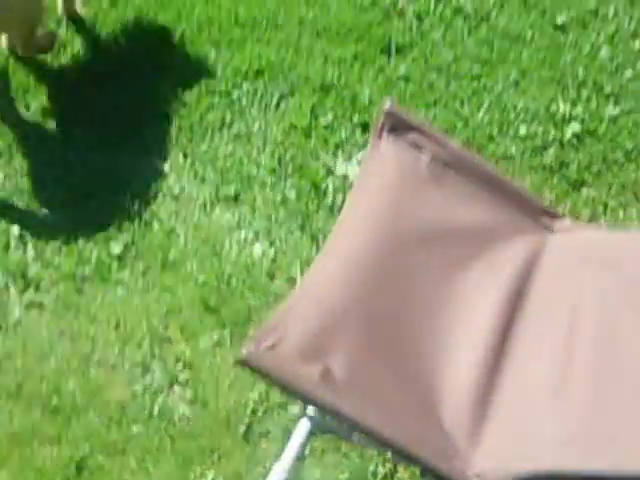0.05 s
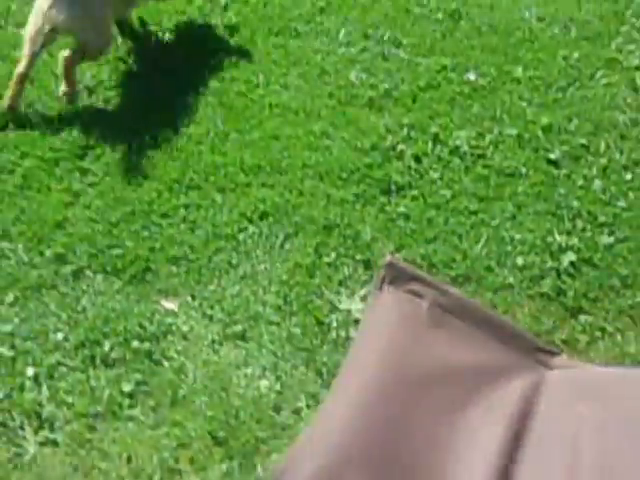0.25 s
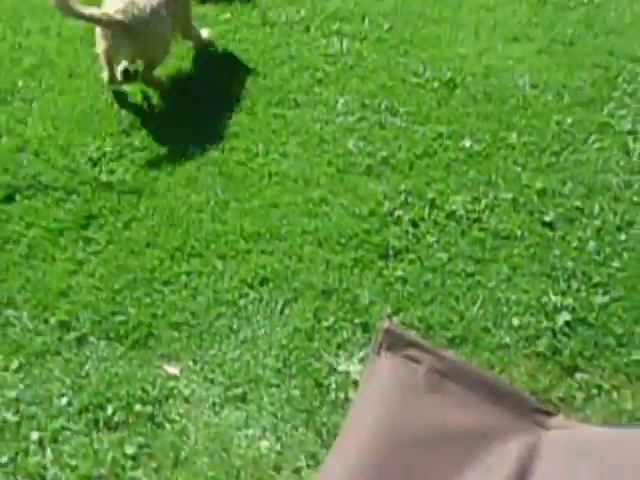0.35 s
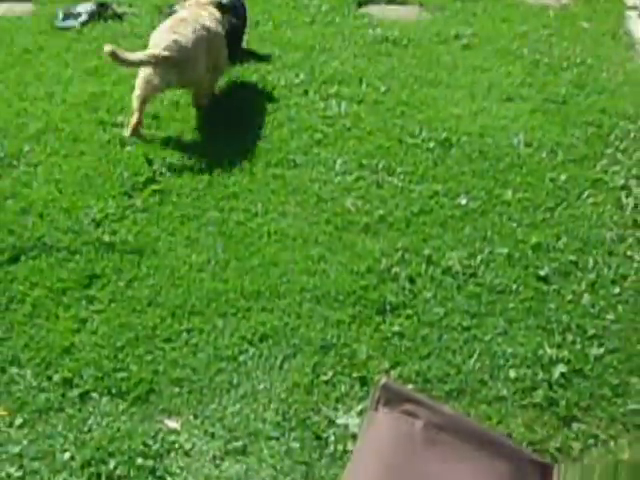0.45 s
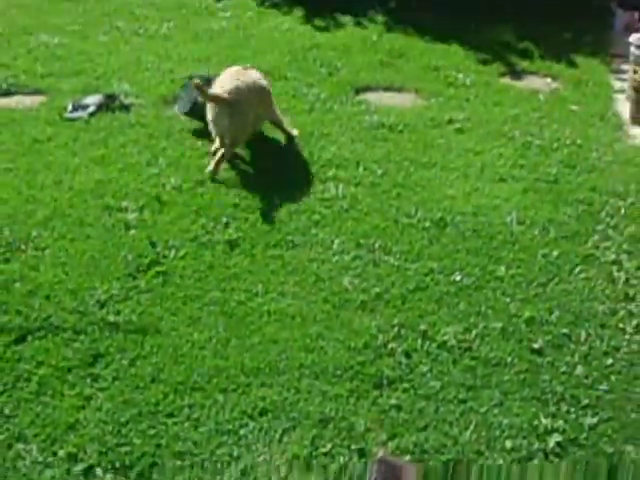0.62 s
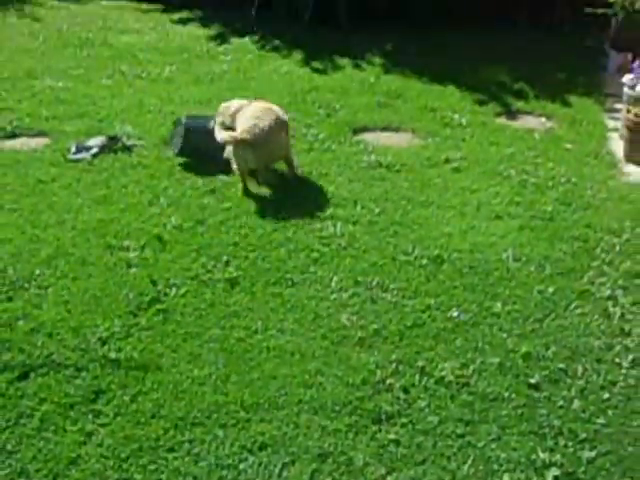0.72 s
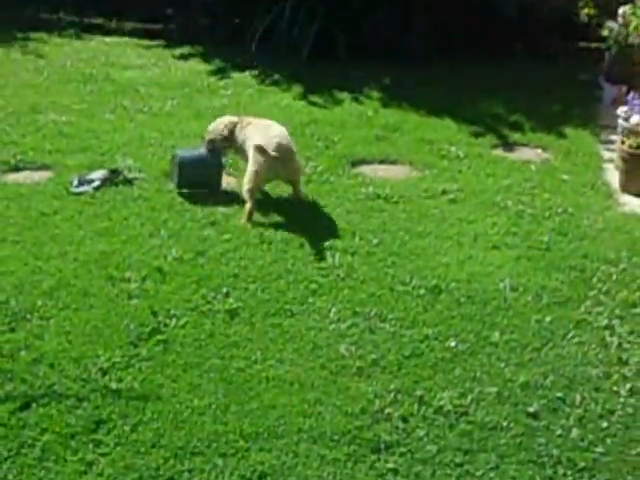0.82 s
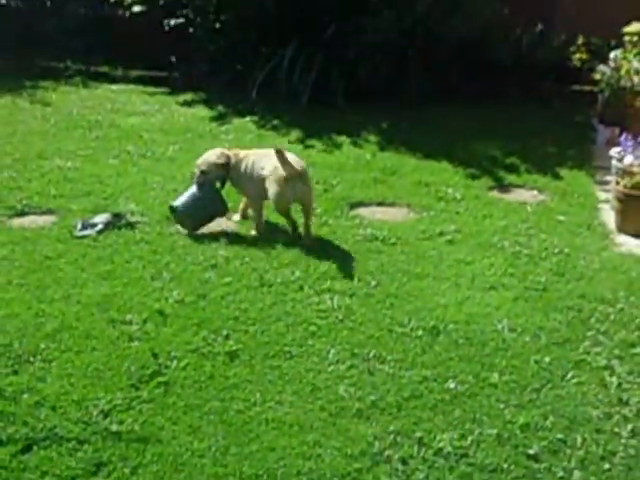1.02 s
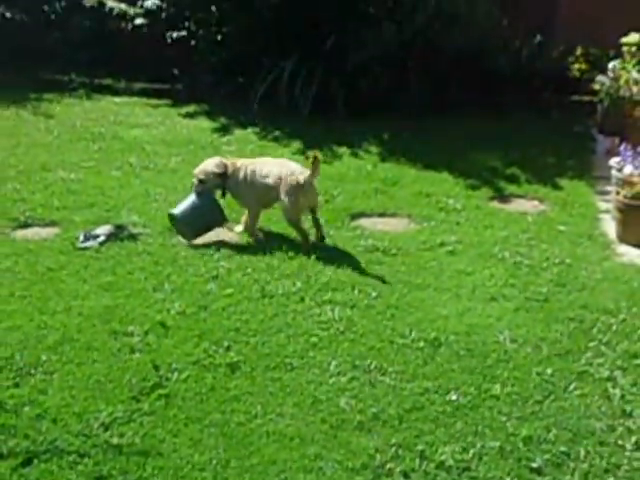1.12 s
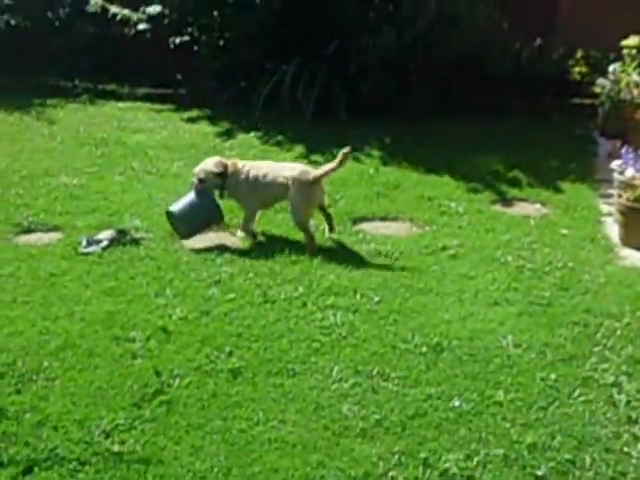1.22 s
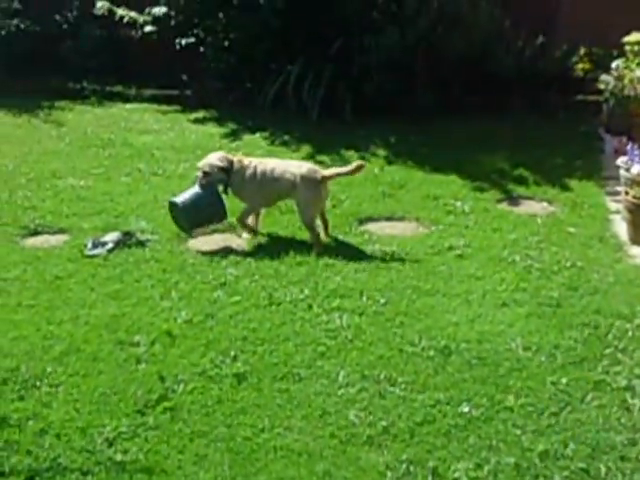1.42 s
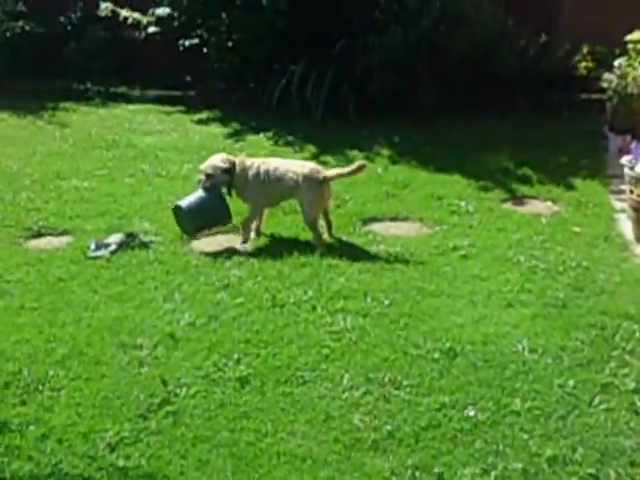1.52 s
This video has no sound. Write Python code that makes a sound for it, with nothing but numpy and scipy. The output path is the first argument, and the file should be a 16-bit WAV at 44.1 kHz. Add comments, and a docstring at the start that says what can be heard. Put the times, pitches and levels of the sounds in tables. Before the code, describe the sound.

A dog knocks an empty plastic plant pot in quick, hollow taps from about 0.7 to 1.2 seconds, loudest at 0.8. Before that, paws scuff and thud on grass from 0.1 to 0.5 seconds, and wind thumps the microphone hard at 0.2. Faint birds peep early over a soft hiss and low wind rumble. Fingers lightly rub the camera, and its case clicks around 1.4 to 1.5 seconds.

```python
"""First come faint bird peeps over a soft hiss and the low rumble of wind on the microphone.
A dog scuffs off across a lawn, its paws crunching and thudding, while swirls of wind thump the microphone.
It bumps an empty plastic plant pot and carries it in its mouth, each knock a tick and a hollow ring.
Fingers rub the hand-held camera now and then, and near the end its case clicks."""
import sys
import numpy as np
from scipy import signal
from scipy.fft import rfft, irfft
from scipy.io import wavfile
from scipy.ndimage import uniform_filter1d

SR = 44100
rng = np.random.default_rng(int(sys.argv[2]) if len(sys.argv) > 2 else 0)


def dump(signal):
    """Clip the signal to [-1, 1] and save it as 16-bit WAV at the path in sys.argv[1]."""
    limited = np.clip(np.atleast_2d(signal).T, -1, 1)
    pcm = np.round(limited * 32767).astype(np.int16)
    wavfile.write(sys.argv[1], SR, pcm)


N = 68355
T = np.arange(N) / SR


def amp(db):
    """Turns decibels into a number to multiply by."""
    return 10 ** (np.asarray(db) / 20)


def unit(x):
    """Scales a sound to an average (rms) level of 1."""
    return x / np.sqrt(np.mean(x ** 2) + 1e-20)


def colour(x, tone):
    """Shapes the bass and treble of x by rows of (Hz, dB), then sets its level to 1."""
    hz, db = np.transpose(tone)
    freqs = np.fft.rfftfreq(len(x), 1 / SR)
    gain = amp(np.interp(np.log(freqs + 1), np.log(hz), db))
    return unit(irfft(rfft(x) * gain, len(x)))


def noise(tone):
    """Steady noise with the given tone, at level 1."""
    return colour(rng.standard_normal(N), tone)


def add(mix, start, sound):
    """Mixes a sound in, starting at a time in seconds."""
    part = mix[max(round(start * SR), 0):][:len(sound)]
    part += sound[:len(part)]


def swell(peak, rise, decay):
    """A loudness curve that grows to a peak and dies away; all times are in seconds."""
    return np.exp(-np.maximum(peak - T, 0) / rise - np.maximum(T - peak, 0) / decay)


def friction(strokes, tone, snaps_per_s=9000, spread_db=3.5):
    """One thing sliding over another makes a crowd of tiny snaps that swells with each stroke."""
    snaps = rng.standard_normal(N) * (rng.random(N) < snaps_per_s / SR)
    snaps *= amp(spread_db * np.minimum(rng.exponential(1, N), 3))
    loudness = sum(amp(db) * swell(peak, rise, decay) for peak, rise, decay, db in strokes)
    return colour(snaps, tone) * loudness


# Bird calls. Each row: start in seconds, length in seconds, pitch in Hz, level in dB.
BIRD_PEEPS = [(0.0, .04, 5010, -63), (0.0, .022, 6550, -63), (0.083, .045, 6530, -59),
              (0.368, .046, 6570, -64), (0.724, .025, 5900, -66)]

def birds(waver_depth=0.015):
    """Small birds far off give thin peeps that waver a little in pitch."""
    out = np.zeros(N)
    for start, length, hz, db in BIRD_PEEPS:
        t = np.arange(0, length, 1 / SR)
        waver = unit(uniform_filter1d(rng.standard_normal(N), size=120))[:len(t)]
        pitch = hz * (1 + waver_depth * waver)
        arch = np.sqrt(abs(np.sin(np.pi * t / length)))
        add(out, start, amp(db) * arch * np.sin(2 * np.pi * np.cumsum(pitch) / SR))
    return out


# The tone of the background. Each row: frequency in Hz, relative level in dB.
AIR_TONE = [(59, -43.5), (100, 3.5), (150, -16), (300, -13), (514, -20), (785, -16.5), (1070, -25),
            (1320, -20), (1830, -26.5), (5180, -25), (7330, -29.5), (8710, -26.5), (9970, -58),
            (13000, -84), (21900, -120)]

def air():
    """A soft, steady outdoor hiss with a low murmur in it."""
    return amp(-59.5) * noise(AIR_TONE)


# How the wind rises and falls. Each row: time in seconds, level in dB before the cap and trim below.
WIND_LEVELS = [(0.0, -53.5), (0.138, -56), (0.184, -34), (0.214, -37.5), (0.232, 10), (0.272, -16),
               (0.332, -22), (0.358, -47), (0.41, -38), (0.482, -42), (0.53, -49), (0.612, -56),
               (0.634, -24), (0.694, -33.5), (0.732, -49.5), (0.836, -39), (0.866, -52), (0.966, -42.5),
               (1.368, -54.5), (1.406, -44.5), (1.442, -42), (1.476, -50.5), (1.55, -46)]
# The tone of the wind. Each row: frequency in Hz, relative level in dB.
WIND_TONE = [(8, -5), (25, 4), (45, -1.5), (80, -13), (130, -24), (170, -28.5), (250, -42), (600, -49.5),
             (2000, -91)]

def wind(cap_db=-36, trim_db=-0.5):
    """Wind flowing over the microphone makes a deep, lumpy rumble."""
    level_db = np.interp(T, *np.transpose(WIND_LEVELS))
    return noise(WIND_TONE) * amp(np.minimum(level_db, cap_db) + trim_db)


# Paw scuffs. Each row: peak time, rise and decay in seconds, then level in dB.
PAW_SCUFFS = [(0.131, 0.0034, 0.0034, -30), (0.141, 0.0048, 0.0077, -31), (0.169, 0.0062, 0.018, -50),
              (0.250, 0.041, 0.014, -54), (0.475, 0.039, 0.043, -61)]
# The tone of the grass. Each row: frequency in Hz, relative level in dB.
GRASS_TONE = [(100, -1), (350, -0.5), (500, -8), (780, 0.5), (1100, -7), (1800, 0), (2600, -3),
              (3150, -6.5), (3700, -3.5), (4500, -1.5), (5400, -8.5), (7000, -16.5), (8000, -19),
              (10000, -11.5)]

def paw_scuffs():
    """Paws drag through the grass and make it rustle."""
    return friction(PAW_SCUFFS, GRASS_TONE)


def garden_echoes(x, fade_s=0.24, echoes_per_s=2000):
    """Fence and shrubs send back a thin scatter of echoes, falling 60 dB in fade_s."""
    t = np.arange(SR // 2) / SR
    echoes = rng.standard_normal(len(t)) * (rng.random(len(t)) < echoes_per_s / SR)
    echoes *= (t > 0.005) * amp(-60 * t / fade_s)
    return signal.fftconvolve(x, echoes / np.linalg.norm(echoes))[:N]


# Paws landing. Each row: time in seconds, crunch level in dB, thud level in dB.
PAW_STEPS = [(0.171, -40.5, -44), (0.18, -45, -52.5), (0.203, -45.5, -54), (0.31, -51.5, -64.5),
             (0.341, -55, -61), (0.362, -60, -46.5), (0.405, -61.5, -63)]
# The tones of the crunch and the thud. Each row: frequency in Hz, relative level in dB.
CRUNCH_TONE = [(150, -14.5), (700, 1.5), (1700, -2), (3000, -11.5), (5000, -20), (10000, -38)]
THUD_TONE = [(60, -4), (180, -4), (290, -2), (450, -25), (1500, -54.5), (10000, -92)]

def paw_steps():
    """Each paw lands on the turf with a small crunch and a soft thud."""
    crunch, thud = noise(CRUNCH_TONE), noise(THUD_TONE)
    return sum(swell(time, rise=0.0021, decay=0.006) * (amp(crunch_db) * crunch + amp(thud_db) * thud)
               for time, crunch_db, thud_db in PAW_STEPS)


# Swirls of wind. Each row: peak time and half width in seconds, then thump and hiss levels in dB.
SWIRLS = [(0.2191, 0.0043, -16, -55), (0.2296, 0.0064, -9.5, -31), (0.292, .0038, -38, -50.5),
          (0.414, 0.011, -33, -72), (0.691, 0.005, -30, -72), (1.409, .004, -40.5, -77)]
# The tone of their hiss. Each row: frequency in Hz, relative level in dB.
SWIRL_TONE = [(300, 15.5), (1200, -15.5), (2000, -0.5), (3200, -14.5), (6500, -14), (8500, -11.5),
              (10000, -60)]

def wind_thumps(front=0.69, wake=2):
    """A swirl hits the microphone: a quick pull, a hissing push, then a slow pull in its wake."""
    out, hiss = np.zeros(N), noise(SWIRL_TONE)
    for peak, half_width, thump_db, hiss_db in SWIRLS:
        offset = (T - peak) / half_width  # front and wake are in half widths too
        offset = np.where(offset < 0, offset / front, offset)
        push = np.exp(-offset ** 2)
        pull_before = 2 * offset ** 2 * push
        pull_after = 2 * (offset / wake) ** 2 * np.exp(-(offset / wake) ** 2) / wake
        pull = np.where(offset < 0, pull_before, pull_after)
        out += amp(thump_db) * (push - pull) + amp(hiss_db) * push * hiss
    return out


# Finger strokes. Each row: peak time, rise and decay in seconds, then level in dB.
FINGER_RUBS = [(0.248, 0.0065, 0.02, -55.5), (0.276, 0.0017, 0.0027, -55), (0.529, .012, 0.0068, -49),
               (1.228, 0.0036, 0.0061, -57), (1.379, 0.0087, 0.0084, -53), (1.400, 0.0027, 0.0024, -51.5),
               (1.413, 0.0024, 0.0014, -43.5), (1.497, 0.0099, .012, -62), (1.531, 0.0058, 0.0022, -50.5)]
# The tone of the rubbing. Each row: frequency in Hz, relative level in dB.
RUB_TONE = [(200, -1), (1500, -6.5), (2600, -6), (4200, 2), (5800, -1), (7200, -6.5), (8000, -5),
            (9000, -23), (10000, -39)]

def finger_rubs():
    """Fingers slide on the camera with short, dry scratches."""
    return friction(FINGER_RUBS, RUB_TONE)


# Knocks on the pot. Each row: start in seconds, ring level in dB, tick level in dB,
# main pitch in Hz, frequency in Hz above which the tick is dulled.
POT_KNOCKS = [(0.676, -48, -56.5, 775, 2980), (0.692, -47, -43, 702, 4520), (0.746, -42, -48, 660, 3060),
              (0.772, -35.5, -40.5, 768, 6300), (0.780, -34, -41, 612, 7200),
              (0.8037, -21.5, -30, 661.7, 8700), (0.8135, -40, -55, 707, 6840),
              (0.818, -35, -45.5, 682, 7030), (0.827, -46, -46, 730, 6000), (0.839, -34, -55, 639, 5000),
              (0.863, -41, -56, 668, 3000), (0.882, -48.5, -58, 690, 3000),
              (0.9135, -30.5, -38.5, 760, 3460), (0.949, -40.5, -76, 711, 3000),
              (0.966, -48, -48.5, 773, 4000), (0.974, -40.5, -44, 693, 2420),
              (1.019, -41.5, -47, 770, 2980), (1.034, -30, -40, 697, 2230), (1.064, -48, -53, 720, 3470),
              (1.088, -43.5, -44.5, 736, 2140), (1.152, -46, -44.5, 735, 3750),
              (1.237, -43.5, -46, 680, 1600)]
# The notes in the pot's ring. Each row: multiple of the main pitch, relative level in dB,
# seconds to fade by 60 dB.
POT_NOTES = [(.34, -10, 0.034), (.52, -20, 0.12), (.88, -16, 0.088), (1.0, 5, 0.021), (1.01, -26, 0.22),
             (1.17, -18, 0.15), (1.78, -13, 0.025), (2.25, -26, 0.06), (3.2, -8.5, 0.0069)]
# The tone of the tick. Each row: frequency in Hz, relative level in dB.
TICK_TONE = [(200, 3), (1000, -1.5), (2200, 2.5), (3100, -1), (4200, -4.5), (5500, 3.5), (7000, -12.5),
             (10000, -23)]

def pot_knocks(pitch_scatter=0.017, contact_s=0.0016):
    """Each knock is a hard tick and a short hollow ring whose pitch shifts with the dog's grip."""
    t = np.arange(SR // 4) / SR
    out, crack = np.zeros(N), noise(TICK_TONE)
    for start, ring_db, tick_db, hz, top_hz in POT_KNOCKS:
        shifts = 1 + pitch_scatter * rng.standard_normal(len(POT_NOTES))
        ring = sum(amp(db - 60 * t / fade_s) * np.sin(2 * np.pi * hz * multiple * shift * t)
                   for (multiple, db, fade_s), shift in zip(POT_NOTES, shifts))
        add(out, start, amp(ring_db) * ring * (1 - np.exp(-t / contact_s)))
        tick = amp(tick_db) * swell(start, rise=0.00036, decay=0.0018) * crack
        out += signal.lfilter(*signal.butter(2, top_hz, fs=SR), tick)
    return out


# Camera case clicks. Each row: time in seconds, ring pitch in Hz, ring level in dB, thud level in dB.
CASE_CLICKS = [(1.4098, 3900, -36, -32), (1.423, 1000, -34, -55), (1.440, 3150, -52, -42.5),
               (1.4701, 3220, -46, -35.5), (1.488, 4580, -41.5, -35.5)]
# The tone of the snap. Each row: frequency in Hz, relative level in dB.
SNAP_TONE = [(200, -1), (1500, 10), (2500, -7), (5000, -18), (7000, -3), (10000, -30)]

def case_clicks(box_hz=680):
    """The camera case gives a snap, a tiny ring and a dull, boxy thud."""
    out, crack = np.zeros(N), noise(SNAP_TONE)
    for time, hz, ring_db, thud_db in CASE_CLICKS:
        ring = swell(time, rise=0.000098, decay=0.00086) * np.sin(2 * np.pi * hz * (T - time))
        snap = amp(-13.5) * swell(time, rise=0.000085, decay=0.0023) * crack
        thud = swell(time, rise=0.00048, decay=0.0052)
        box = swell(time, rise=0.00017, decay=0.0046) * np.sin(2 * np.pi * box_hz * (T - time))
        out += amp(ring_db) * (ring + snap) + amp(thud_db) * (thud + amp(-11.5) * box)
    return out


def scene():
    """Mixes everything into one channel; only the pot and the paws echo."""
    knocks = pot_knocks()
    paws = paw_scuffs() + paw_steps()
    echoes = garden_echoes(amp(-7.5) * knocks + amp(-11) * paws)
    background = birds() + air()
    at_microphone = wind() + wind_thumps() + finger_rubs() + case_clicks()
    return (knocks + paws + echoes + background + at_microphone)[None]


def record(dry, camera_rate_hz=16000, band_hz=7750, top_hz=9500):
    """The camera's low sampling rate cuts the highest treble and leaves a faint mirror image there."""
    band = signal.oaconvolve(dry, signal.firwin(101, band_hz, fs=SR)[None], "same")
    mirrored = band * (1 + 2 * amp(-14) * np.cos(2 * np.pi * camera_rate_hz * T))
    treble_cut = signal.firwin(121, top_hz, window=("kaiser", 8), fs=SR)
    return signal.oaconvolve(mirrored, treble_cut[None], "same")


dry = scene()
out = record(dry)
dump(out)
```